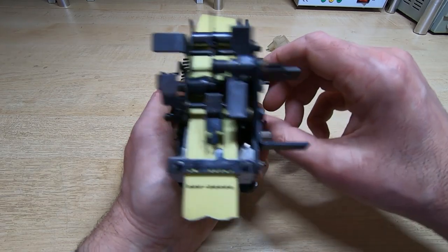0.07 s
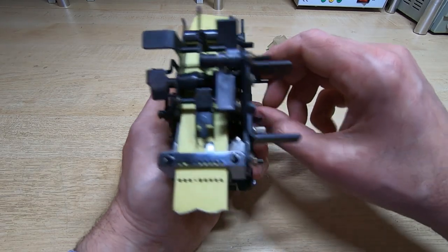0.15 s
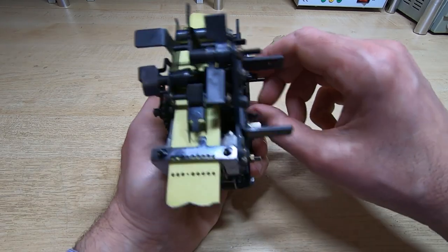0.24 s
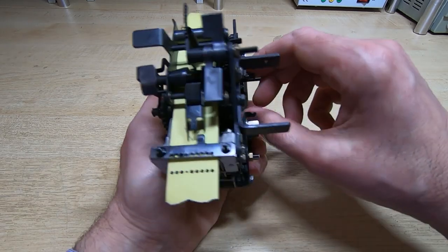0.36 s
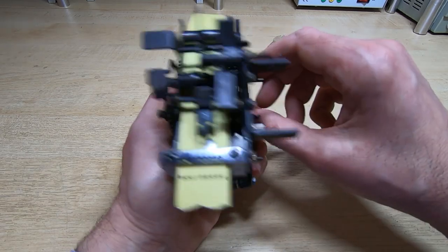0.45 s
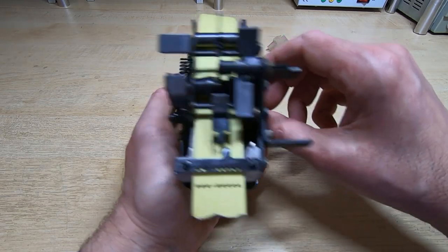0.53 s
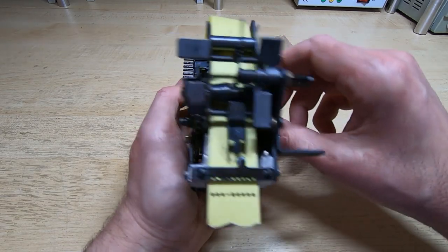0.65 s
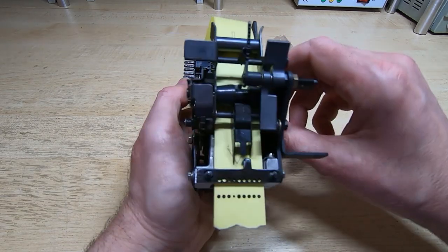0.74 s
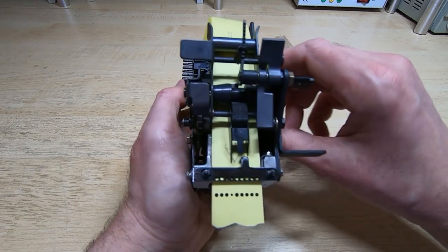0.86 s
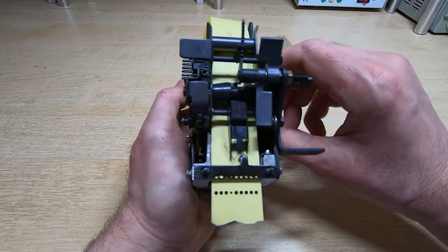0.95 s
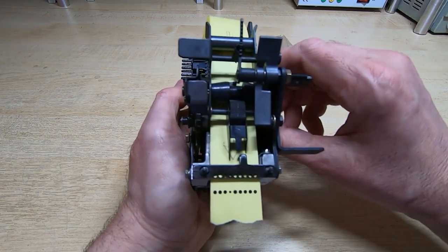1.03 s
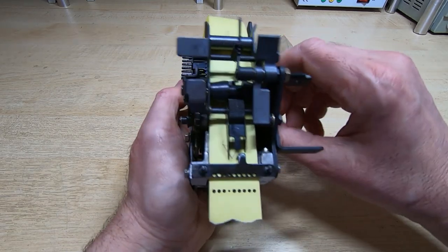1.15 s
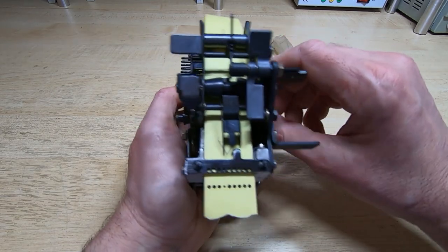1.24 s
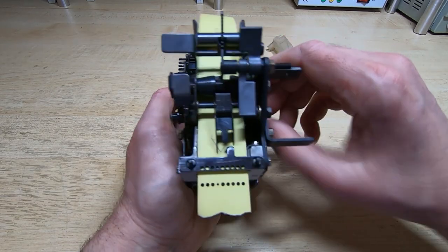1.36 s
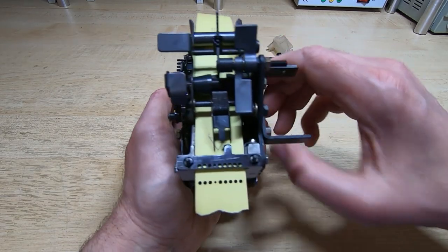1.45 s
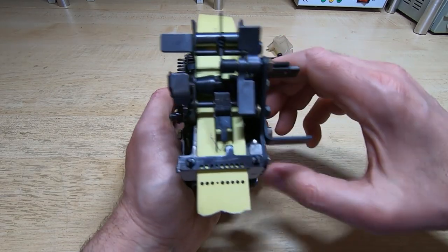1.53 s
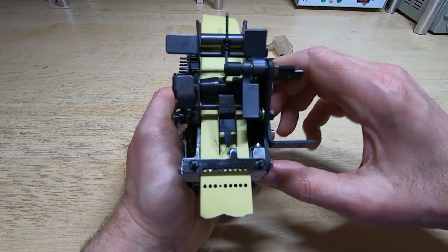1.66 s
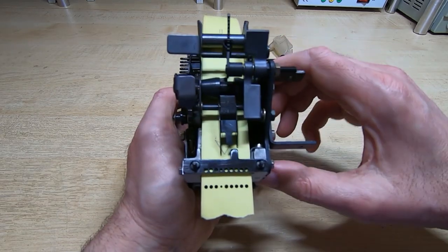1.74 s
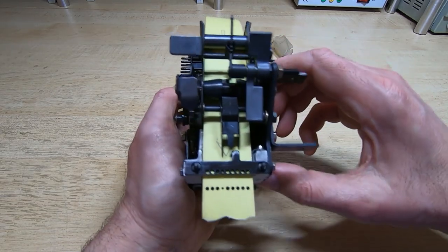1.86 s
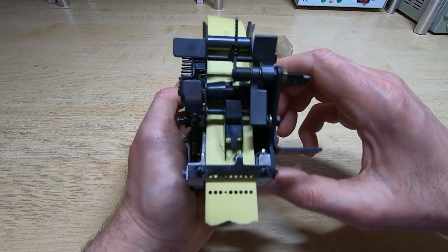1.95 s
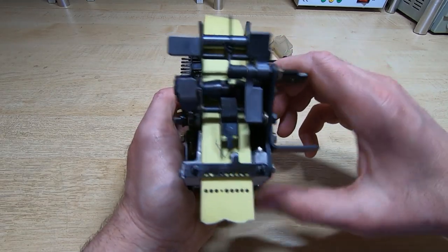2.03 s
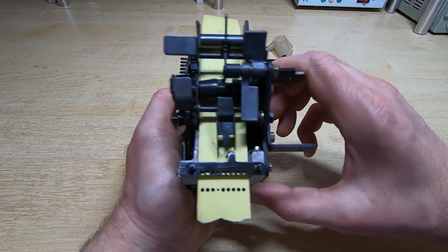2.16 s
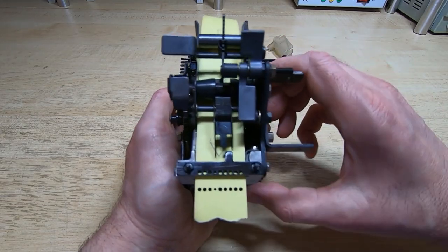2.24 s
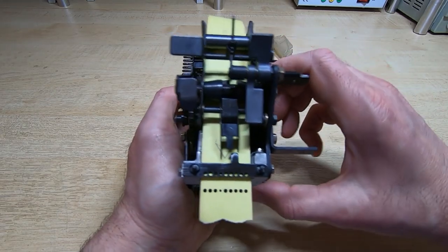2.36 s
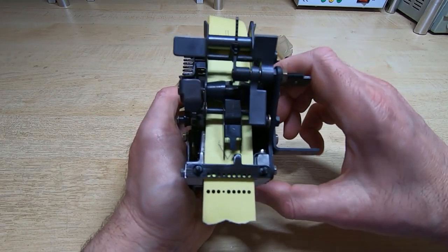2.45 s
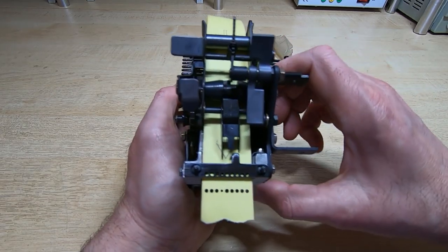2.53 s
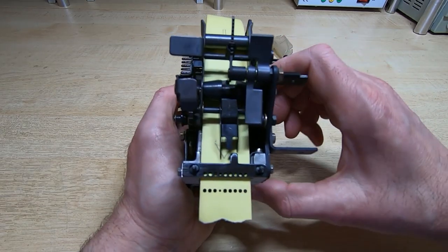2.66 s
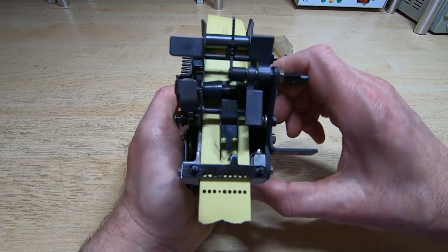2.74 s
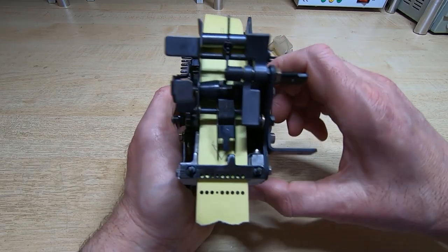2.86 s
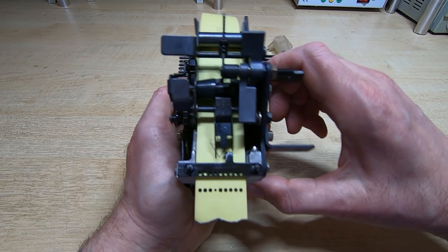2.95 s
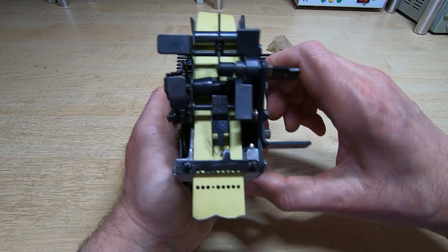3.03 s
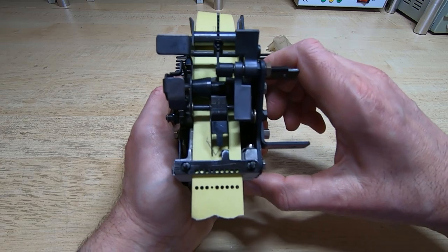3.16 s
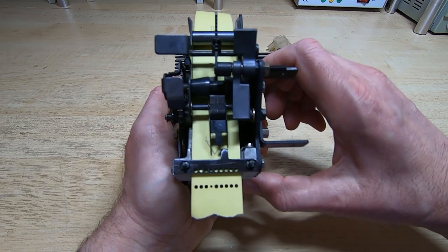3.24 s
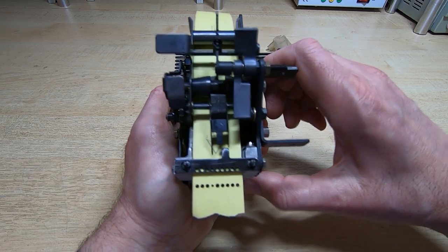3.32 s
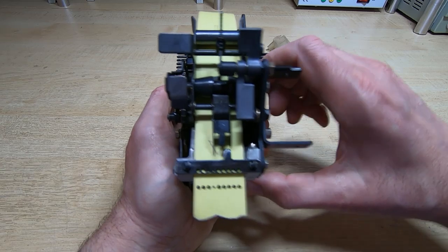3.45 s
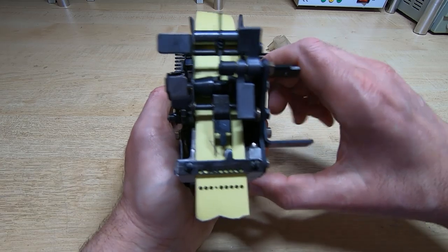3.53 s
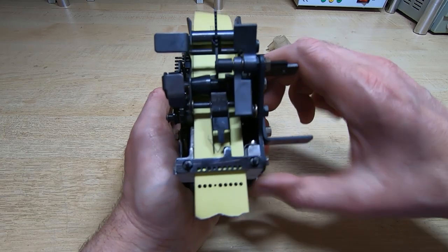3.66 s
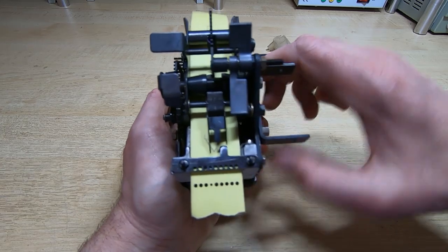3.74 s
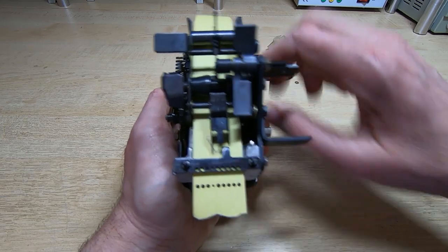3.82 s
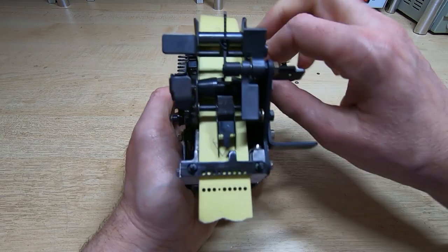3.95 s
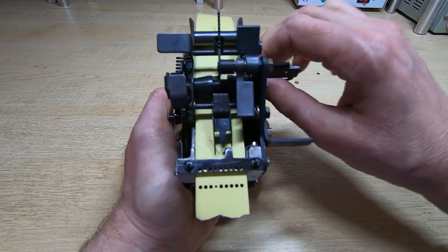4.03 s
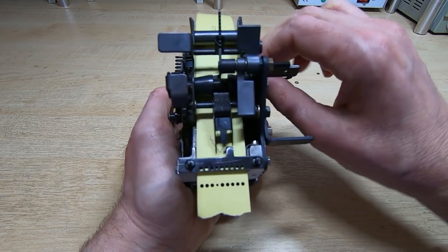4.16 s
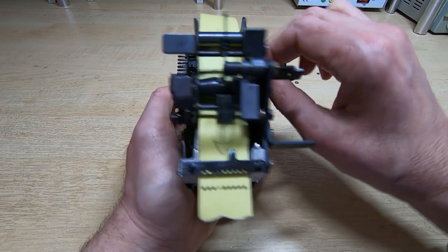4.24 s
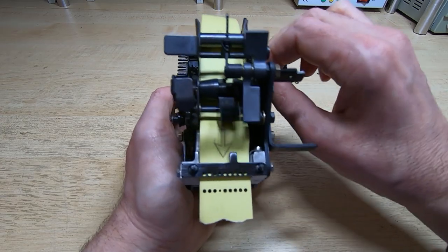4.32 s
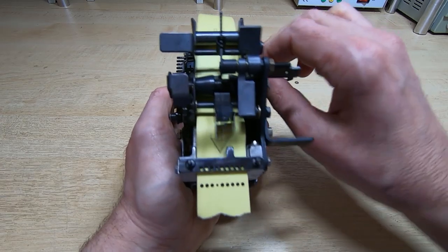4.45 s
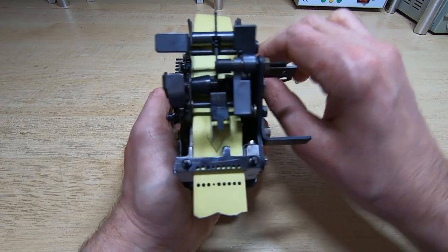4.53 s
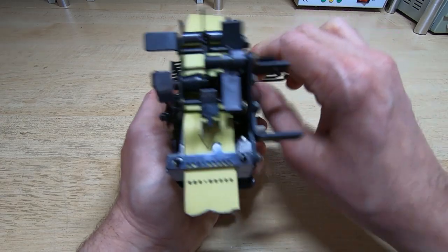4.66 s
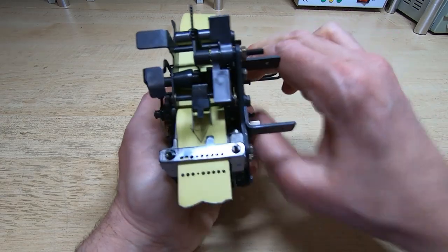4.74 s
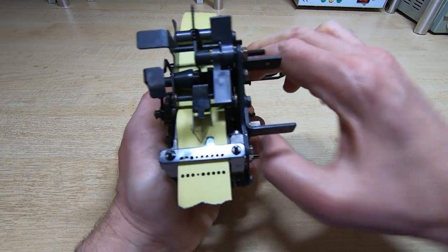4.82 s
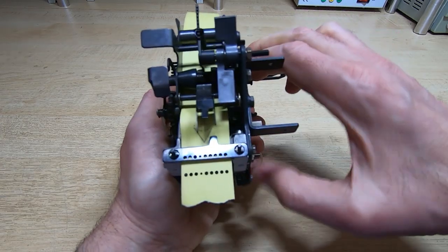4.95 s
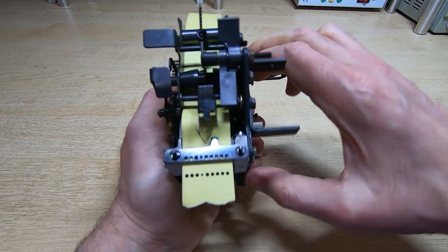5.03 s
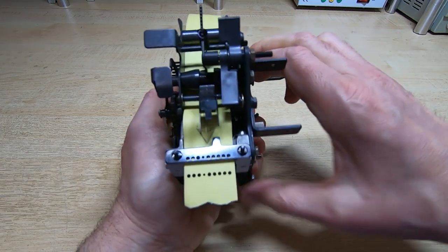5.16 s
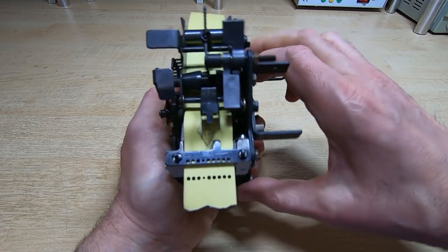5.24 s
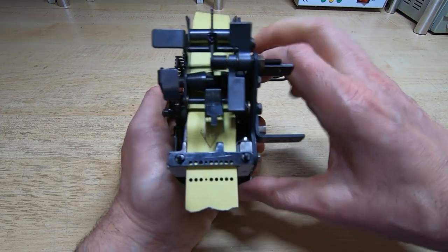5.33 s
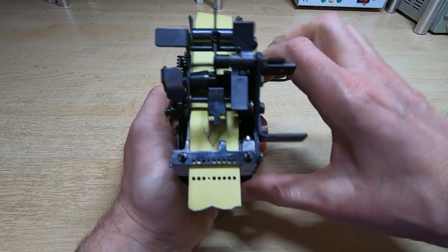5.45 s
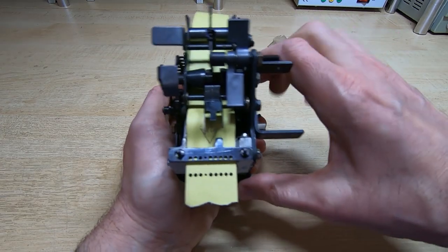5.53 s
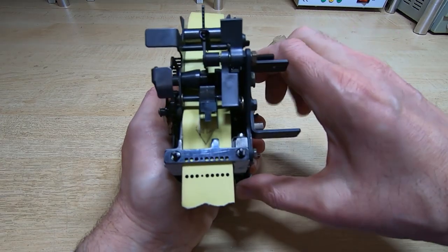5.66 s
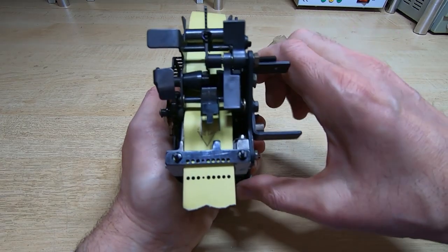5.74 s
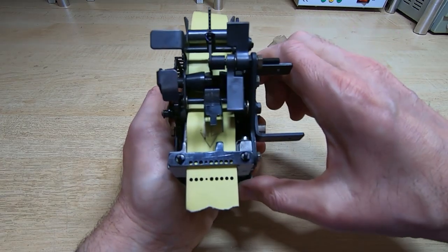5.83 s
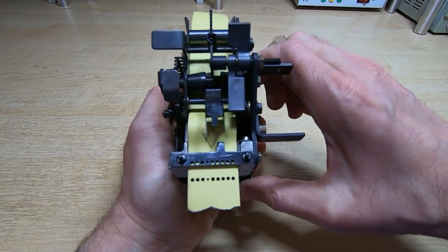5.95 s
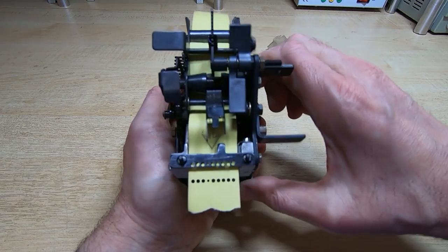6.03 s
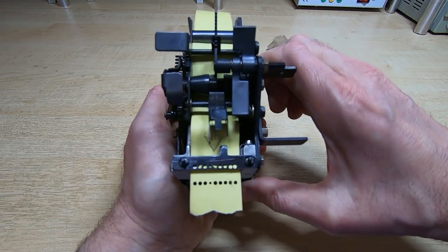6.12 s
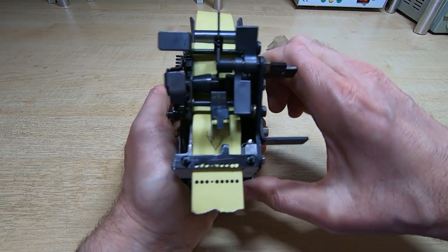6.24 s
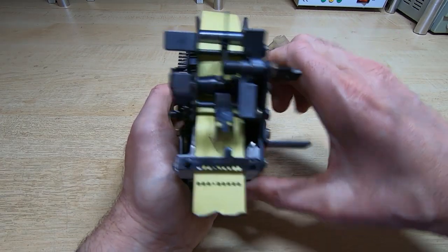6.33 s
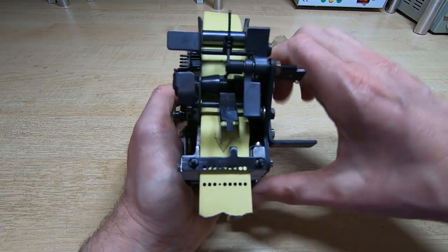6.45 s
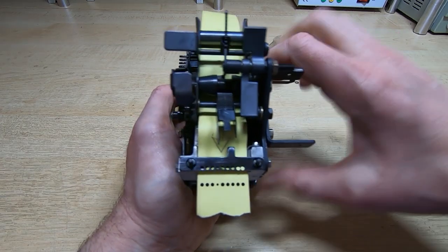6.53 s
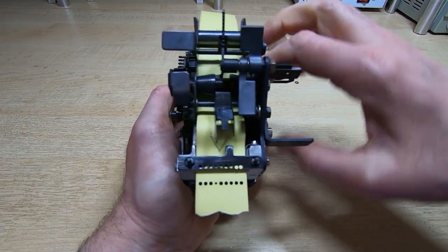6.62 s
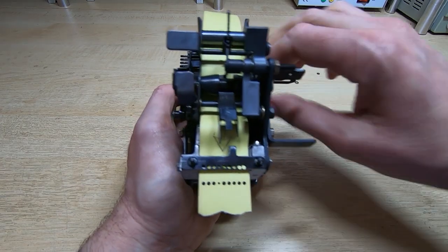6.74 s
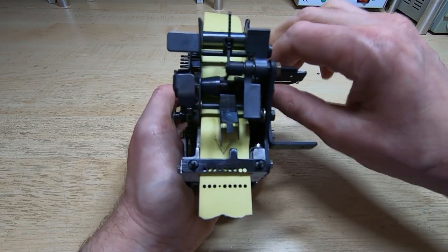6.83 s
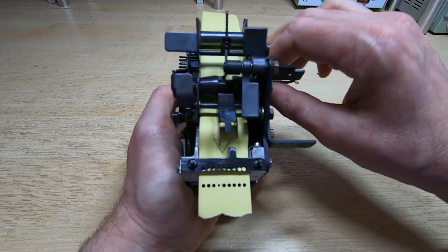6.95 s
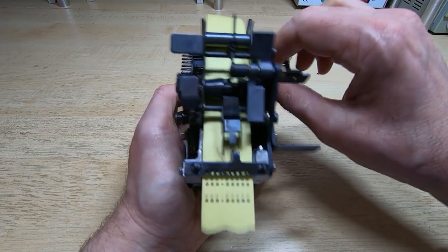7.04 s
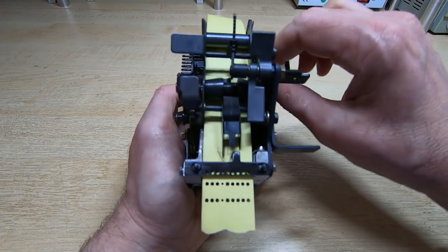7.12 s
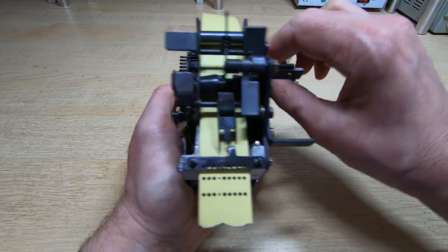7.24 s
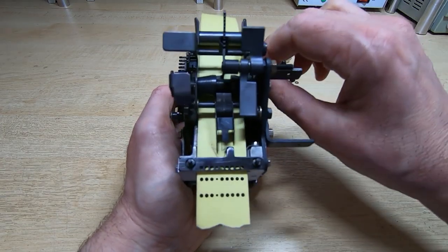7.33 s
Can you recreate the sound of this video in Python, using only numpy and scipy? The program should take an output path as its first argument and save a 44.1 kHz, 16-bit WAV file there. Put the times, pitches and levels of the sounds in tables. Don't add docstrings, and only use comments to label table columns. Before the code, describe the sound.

Irregular sharp metallic clacks and small ratchet ticks from a hand-worked steel tape punch, close up in a small live room over steady hum and hiss.

```python
import sys
import numpy as np
from scipy import signal
from scipy.fft import rfft, irfft, next_fast_len
from scipy.io import wavfile
from scipy.ndimage import uniform_filter1d

SR = 44100
rng = np.random.default_rng(int(sys.argv[2]) if len(sys.argv) > 2 else 0)


def persist_wave(psi):
    counts = np.round(np.clip(psi, -1, 1) * 32767).astype(np.int16)
    wavfile.write(sys.argv[1], SR, np.atleast_2d(counts).T)


def linear_from_db(decibels):
    return 10 ** (np.asarray(decibels, float) / 20)


N = 325743


def band(x, lo_hz, hi_hz):
    return signal.lfilter(*signal.butter(2, [lo_hz, min(hi_hz, .45 * SR)], "bandpass", fs=SR), x)


def fade(t, t60):
    return np.exp(-np.log(1000) * t / t60)


def add(out, s, x):
    i = int(s * SR)
    out[i:i + len(x)] += x[:N - i]


def strike(modes, chance, push, scatter_db=3):
    t = np.arange(2048) / SR
    hz, db, t60 = np.transpose(modes)[:, :, None]
    size, detune = chance[:len(modes), None], chance[-len(modes):, None]
    tone = np.sin(2 * np.pi * hz * (1 + .015 * detune) * t)
    body = linear_from_db(db + scatter_db * size) * fade(t, t60) * tone
    x = signal.fftconvolve(body.sum(axis=0), push)[:len(t)]
    return x / np.abs(x).max()


def ring(hz, db, t60):
    t = np.arange(16384) / SR
    return linear_from_db(db) * (1 - fade(t, 0.0015)) * fade(t, t60) * np.sin(2 * np.pi * hz * t)


DULL_FRAME_DB, DULL_SPRINGS_DB = -.4, -4
SPRING_SHARE = .6


def ticks(rows):
    return [(s, db, hz, DULL_FRAME_DB - up, DULL_SPRINGS_DB + SPRING_SHARE * up) for s, db, hz, up in rows]


# [t/s, levers level/dB, frame f/Hz, frame rel level/dB, springs rel level/dB]
BLOWS = [(1.0997, -6.5, 1734, -11, -3), (3.3531, -22.5, 1507, 6, .4), (3.6057, -31, 1900, -10, 7),
         (4.2695, -5.5, 1400, -5.5, -1.5), (4.2887, -9, 1300, -2.5, -4.5), (4.3551, -19, 1680, -.4, -5.5),
         (4.7506, -9.5, 1590, -9, -7), (5.5881, -28, 1800, 4.5, -3), (6.0775, -4, 1220, -13, -3.5),
         (6.0867, -17.5, 1350, -6.5, 3), (6.407, -29.5, 1730, -11.5, -4.5),
         (6.4862, -21.5, 1620, -1.5, -2.5), (7.0483, -10.5, 1930, -9, 10.5), (7.0916, -13, 1500, -8, 10.5)]
# [t/s, level/dB, frame f/Hz, brightness/dB]
BOUNCES = [(4.2804, -27, 2600, -3), (4.2925, -25, 1680, -4), (4.2951, -21, 1540, -6),
           (4.301, -31, 1220, .3), (6.4904, -35, 1620, -9), (7.0788, -29, 1660, 1.5),
           (7.1014, -23.5, 1540, 3), (7.143, -29, 1530, 4), (7.18, -36, 1580, 6), (7.205, -41, 1500, 6),
           (7.222, -43, 1500, 5)]
# [t/s, level/dB, frame f/Hz, brightness/dB]
PAWL = [(1.0222, -49, 1300, -1.5), (2.5059, -45, 1760, -5), (2.7416, -43, 1480, 1.5),
        (2.9767, -37, 1434, -3), (2.9955, -36, 1750, -1.5), (3.0129, -28, 1850, 1.5),
        (3.018, -30, 1550, .3), (3.4171, -35, 1810, 2.5), (3.6253, -33, 1710, 2.5), (3.6933, -41, 1740, 6),
        (4.4669, -25, 1470, .3), (4.539, -29, 1520, -1.5), (4.5884, -32, 1610, -.3),
        (4.6199, -33, 1550, -3), (4.6427, -41, 1560, -1.5), (4.677, -38, 1385, -1.5),
        (5.5117, -45, 1800, -4), (6.7997, -36, 1790, 3), (6.9694, -51, 1540, 3), (7.333, -45, 1770, -1.5)]
# [t/s, level/dB]
COILS = [
    (3.5063, -38),
    (3.521, -41),
    (3.5984, -36),
    (6.3689, -44),
    (6.3853, -41.5),
    (6.8942, -46),
    (6.9087, -44),
    (6.9157, -41),
]
COIL_FRAME_HZ, COIL_BRIGHT_DB = 1400, 11.5
# [multiple of its pitch, level/dB, t60/s]
FRAME = [(.85, -24, .01), (1., 13, 0.022), (1.15, 6, .01), (1.7, -15, .01)]
# [f/Hz, level/dB, t60/s]
LEVERS = [(3240, -20.5, 0.017), (3440, 1.5, 0.0054), (3960, 1, 0.015), (4220, 5.5, 0.01), (4880, 2, 0.011),
          (5075, 10.5, 0.007), (5480, 0, 0.01), (6280, -8, 0.0056), (6460, -15, 0.0051),
          (7440, -9.5, 0.024)]
# [f/Hz, level/dB, t60/s]
SPRINGS = [(7860, -25, 0.011), (8600, -16, 0.0096), (9480, 4, 0.014), (10500, 8, 0.012),
           (11290, 2.5, 0.0033), (11900, 12, 0.0095), (12460, -18, 0.0077), (14200, -5, 0.0053)]
# [low f/Hz, high f/Hz]
PARTS = [(1000, 3000), (2850, 7500), (7800, 15000)]


def contacts():
    near, far, t = np.zeros(N), np.zeros(N), np.arange(512) / SR
    click = 1. * (t == 0)
    coils = [(s, db, COIL_FRAME_HZ, COIL_BRIGHT_DB) for s, db in COILS]
    for s, db, hz, frame_db, spring_db in BLOWS + ticks(BOUNCES + PAWL + coils):
        chance, rough = rng.standard_normal((3, 20)), rng.standard_normal((3, len(t)))
        rough = rough * (1 - fade(t, 0.0016))
        frame = [(k * hz, d, t60) for k, d, t60 in FRAME]
        bands = [(hz / 1.4, hz * 1.3)] + PARTS[1:]
        groups = zip((frame, LEVERS, SPRINGS), (frame_db, 0, spring_db), bands, chance, rough, (.002, .004, .004))
        for modes, rel_db, (lo, hi), luck, noise, push_t60 in groups:
            crack = band(band(noise * fade(t, 0.011), lo, hi), lo, hi)
            blow = band(strike(modes, luck, noise * fade(t, push_t60)), lo, hi)
            add(near, s, linear_from_db(db + rel_db + 1.5) * blow)
            add(near, s, linear_from_db(db + rel_db + 1.3) * crack / np.abs(crack).max())
            even = band(band(click, lo, hi), lo, hi)
            add(far, s, linear_from_db(db + rel_db + 17.5) * even / np.linalg.norm(even))
    return near, far


FRAME_RING_DB, PAWL_RING_DB, FRAME_RING_T60_S = -9.5, -8, .08
# [t/s, f/Hz, level/dB, t60/s]
RINGS = [(1.1012, 10700, -1.5, .016), (1.1012, 10600, -27, .14), (1.102, 1720, -24, .09),
         (4.75, 10500, -11.5, .026), (4.751, 10600, -32, .13), (4.276, 2660, -17, .035),
         (6.079, 2750, -13, .028), (6.09, 2700, -29, .2), (6.078, 1950, -14, .02),
         (6.088, 2200, -20.5, .02), (6.078, 170, -28, .035), (6.078, 300, -34, .03),
         (6.407, 3000, -19, .018), (6.407, 5100, -33, .012), (6.407, 550, -37, .085),
         (3.627, 3500, -29, .023), (3.607, 6400, -38, .05), (5.589, 7100, -40, .1),
         (5.589, 3800, -28, .018), (5.589, 2350, -36, .08), (4.539, 4050, -32, .04),
         (7.049, 9500, -7, .012), (7.062, 9550, -22, .2), (7.0915, 12300, -10.5, .02),
         (7.0915, 10300, -15, .025)]
# [t/s, level/dB]
ARM = [
    (1.1008, -15),
    (4.2703, -10.5),
    (4.289, -11.5),
    (4.296, -18),
    (7.093, -16),
    (7.102, -14),
]
ARM_HZ, ARM_T60_S = 4900, .014


def rings():
    out = np.zeros(N)
    modes = RINGS + [(s, ARM_HZ, db, ARM_T60_S) for s, db in ARM]
    for rows, over_db in ((BLOWS, FRAME_RING_DB), (ticks(PAWL), PAWL_RING_DB)):
        modes = modes + [(s, hz, db + rel + over_db, FRAME_RING_T60_S) for s, db, hz, rel, _ in rows]
    for s, *mode in modes:
        flutter = uniform_filter1d(np.repeat(rng.standard_normal(128), 128), size=128)
        add(out, s, ring(*mode) * (1 + 0.5 * flutter))
    return out


# [f/Hz, level/dB, t60/s]
TONGUE = [(9631, -11, .22), (11770, -19, .16), (6799, -23, .25), (7596, -24, .13), (5529, -20, .035),
          (13160, -29, .1)]
TONGUE_FREE_S, TONGUE_HELD_S, TONGUE_HELD_DB = 4.3178, 4.352, -13


def tongue():
    out = np.zeros(N)
    tone = sum(ring(*mode) for mode in TONGUE)
    t = TONGUE_FREE_S + np.arange(len(tone)) / SR
    held = np.clip((t - TONGUE_HELD_S) / 0.0061, 0, 1)
    add(out, TONGUE_FREE_S, tone * linear_from_db(TONGUE_HELD_DB * held))
    return out


RATTLE_RISE_S, RATTLE_RISE_SHARE, SLIDE_RISE_SHARE = .006, .1, .28
# [t/s of the top, t60/s, frame, levers, springs level/dB]
RATTLES = [(2.51, .063, -58, -46, -58), (2.995, .046, -34, -39, -38), (3.015, .08, -30, -53, -31.5),
           (3.62, .085, -46, -45, -52), (4.2668, .011, -50, -24, -14), (4.282, .22, -27, -37, -30),
           (5.592, .16, -35.5, -54, -47), (6.075, .034, -28, -15.5, -14), (6.086, .19, -26, -21, -19),
           (6.445, .2, -33, -38, -38), (6.5, .12, -37, -46, -38), (6.803, .079, -41, -47, -55),
           (7.047, .049, -34, -14, -35), (7.058, .098, -27, -34, -24), (7.105, .19, -42, -48, -31)]
# [t/s of the top, t60/s, frame, levers, springs level/dB]
SLIDES = [
    (3.59, .15, -41, -47, -52),
    (3.92, .3, -72, -64, -53),
    (6.478, .1, -37, -39, -46),
    (7.035, .11, -46.5, -50, -59),
]


def rattles():
    t, out = np.arange(N) / SR, np.zeros(N)
    moves = [(min(RATTLE_RISE_S, RATTLE_RISE_SHARE * row[1]), row) for row in RATTLES]
    moves += [(SLIDE_RISE_SHARE * row[1], row) for row in SLIDES]
    frame = [(k * 1650, d, t60) for k, d, t60 in FRAME]
    for k, (modes, (lo, hi)) in enumerate(zip((frame, LEVERS, SPRINGS), PARTS)):
        uneven = np.repeat(rng.exponential(size=N // 16 + 1).clip(0, 4), 16)[:N]
        grains = rng.standard_normal(N) * linear_from_db(3.6 * uneven)
        effort = np.zeros(N)
        for rise, (s, t60, *db) in moves:
            u = t[:int((rise + t60) * SR)] - rise
            swell = np.where(u < 0, 1 + u / rise, fade(np.maximum(u, 0), t60))
            add(effort, s - rise, linear_from_db(db[k]) * swell)
        grains = grains / grains.std() * effort
        body = strike(modes, np.zeros(20), np.ones(1))
        rung = signal.oaconvolve(grains, body / np.linalg.norm(body))[:N]
        dry_ticks = band(grains, lo, hi) * np.sqrt(SR / 2 / (hi - lo))
        out += 0.45 * rung + 0.55 * dry_ticks
    return out


# [t/s, level/dB, t60/s]
THUDS = [(4.288, -23, 0.05), (6.078, -28.5, 0.18), (7.048, -45, .08), (7.102, -37, 0.074),
         (7.143, -38.5, 0.059), (3.013, -37.5, 0.096), (1.101, -36, .05), (3.354, -46, .05),
         (6.486, -43, 0.07), (5.589, -40, 0.054), (7.18, -43, 0.057)]


def thuds():
    out, t = np.zeros(N), np.arange(8192) / SR
    for s, db, t60 in THUDS:
        add(out, s, linear_from_db(db + 14.5) * band(rng.standard_normal(len(t)) * fade(t, t60), 520, 1120))
    return out


# [delay t/s, level/dB]
ECHOES = [(.0068, -15), (.0108, -15), (.0163, -14)]


def echoes(x):
    out = np.zeros(N)
    for s, db in ECHOES:
        add(out, s, linear_from_db(db) * x)
    return band(out, 1000, 7500)


# [f/Hz, level/dB, t60/s]
ROOM = [(500, -30, .2), (1000, -6.5, 0.35), (2120, -12.5, 0.45), (3250, -9, 0.15), (5060, -7, 0.33),
        (6450, -7.5, 0.19), (9200, -19.5, 0.22), (14200, -6.5, 0.098)]


def tail():
    t = np.arange(16384) / SR
    out = np.zeros(len(t))
    for hz, db, t60 in ROOM:
        part = band(rng.standard_normal(len(t)), hz / 1.51, hz * 1.415)
        part = part * fade(t, t60) * (1 - fade(t, 0.014))
        out += linear_from_db(db) * part / np.linalg.norm(part) * np.sqrt(hz / SR)
    return out


MAINS_HZ, HUM_DB = 50, -40


def hum(t):
    waver = uniform_filter1d(np.repeat(rng.standard_normal(N // 2048 + 1), 2048)[:N], size=2048)
    return linear_from_db(HUM_DB + 1.1 * waver) * np.sqrt(2) * np.sin(2 * np.pi * MAINS_HZ * t)


HISS_DB, HISS_TOP_HZ = -49, 15700
# [f/Hz, level/dB per Hz]
HISS = [(8, -3.5), (30, -8.5), (80, -16), (250, -25.5), (550, -30.5), (2000, -37), (8000, -42.5),
        (15000, -45)]


def hiss():
    size = next_fast_len(N)
    hz, table = np.fft.rfftfreq(size, 1 / SR), np.array(HISS)
    shape = linear_from_db(np.interp(np.log(hz + 1), np.log(table[:, 0]), table[:, 1])) * (hz < HISS_TOP_HZ)
    x = irfft(rfft(rng.standard_normal(size)) * shape, size)[:N]
    return linear_from_db(HISS_DB) * x / band(x, 200, 15000).std()


# [t/s, level/dB]
GAIN = [
    (0, 0),
    (6.07, 0),
    (6.12, -3.5),
    (6.3, -3.5),
    (6.5, -0.5),
    (6.7, 0),
    (7.39, 0),
]


def noise_floor(t):
    return (hum(t) + hiss()) * linear_from_db(np.interp(t, *np.transpose(GAIN)))


SIDE_ECHO_DB, SIDE_BASS_DB, SIDE_TREBLE_DB = -19.5, -26, -19


def scene():
    t = np.arange(N) / SR
    near, far = contacts()
    loose = band(rattles(), 730, 22000) + thuds()
    free = rings() + tongue()
    punch = band(near, 800, 18900) + loose + free
    to_walls = far + loose + linear_from_db(-5) * free
    wet, other = (signal.oaconvolve(to_walls, tail())[:N] for _ in range(2))
    early = echoes(punch)
    apart = hiss()
    side = linear_from_db(SIDE_BASS_DB) * band(apart, 220, 1100) + linear_from_db(SIDE_TREBLE_DB) * band(apart, 4000, 27000)
    side = side + linear_from_db(SIDE_ECHO_DB) * band(early + other, 400, 19000)
    return punch + early + wet + noise_floor(t) + side * np.array([[1], [-1]])


def roll_off(x):
    return signal.sosfilt(signal.butter(12, 17000, fs=SR, output="sos"), x)


TOP_HZ = 16600


def record(dry):
    low_pass = signal.ellip(8, .2, 60, TOP_HZ, fs=SR, output="sos")
    mix = signal.sosfilt(low_pass, np.clip(dry, -.9, .9))
    return roll_off(mix)


dry = scene()
out = record(dry)
persist_wave(out)
```